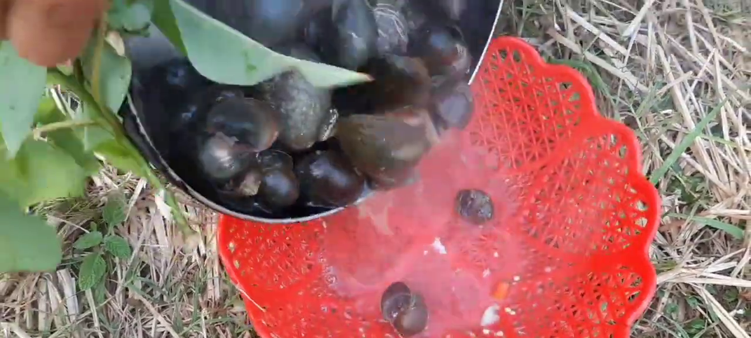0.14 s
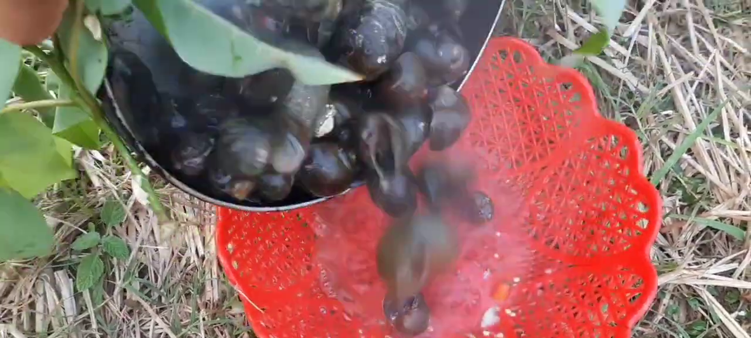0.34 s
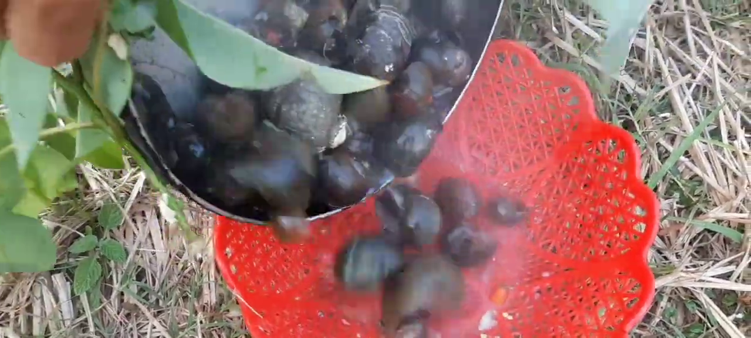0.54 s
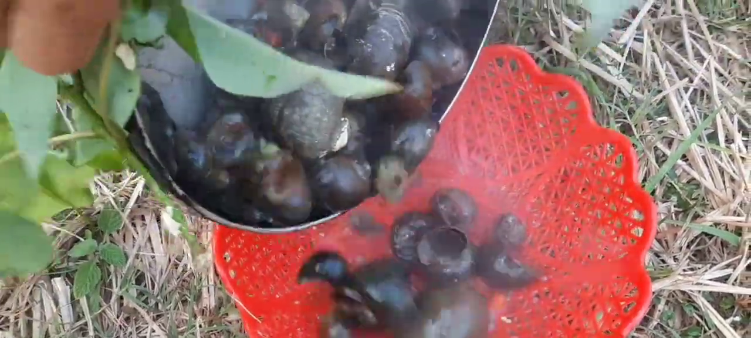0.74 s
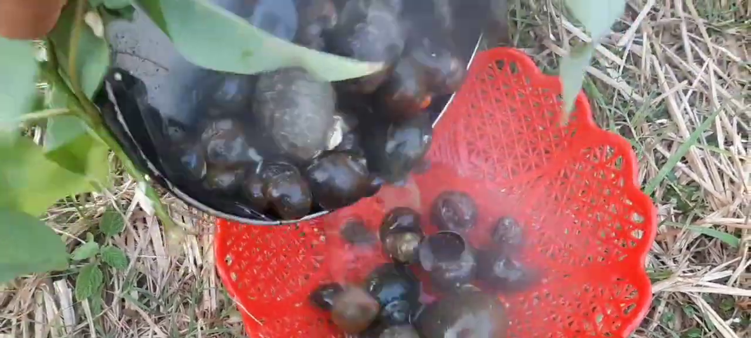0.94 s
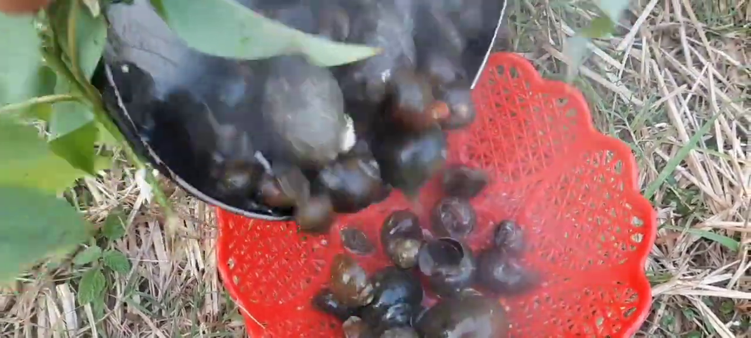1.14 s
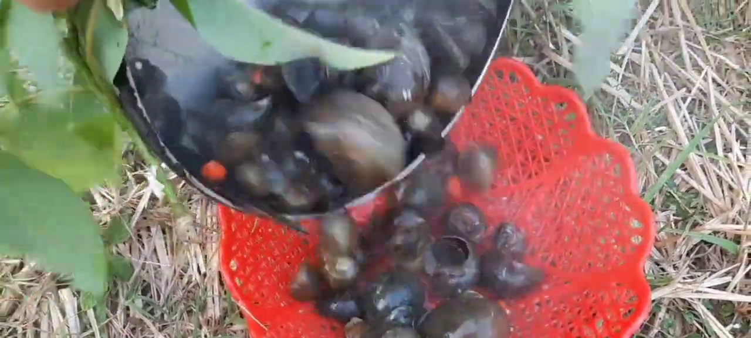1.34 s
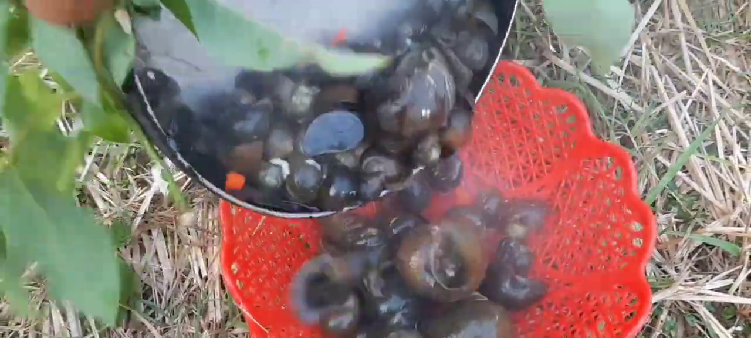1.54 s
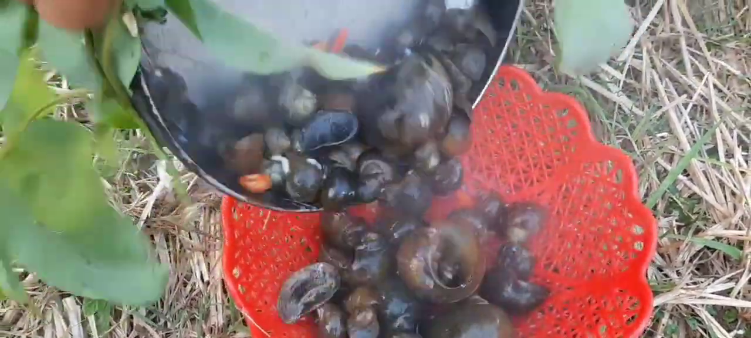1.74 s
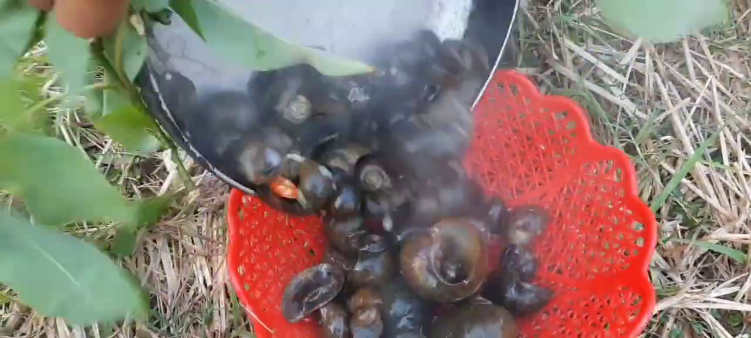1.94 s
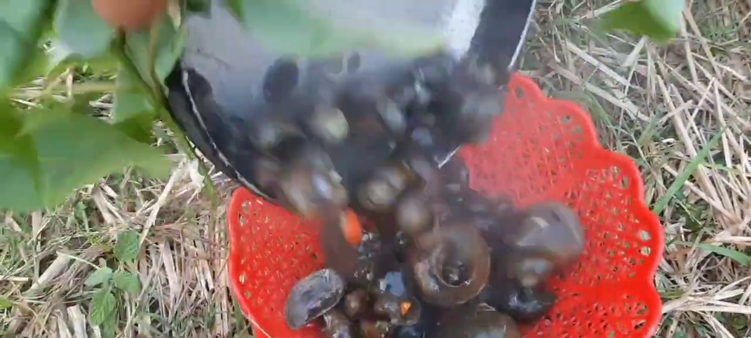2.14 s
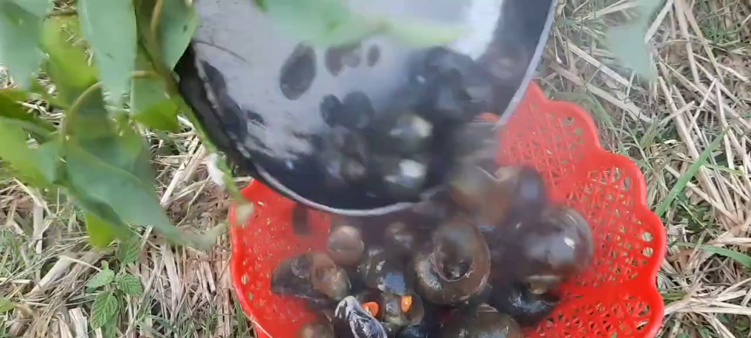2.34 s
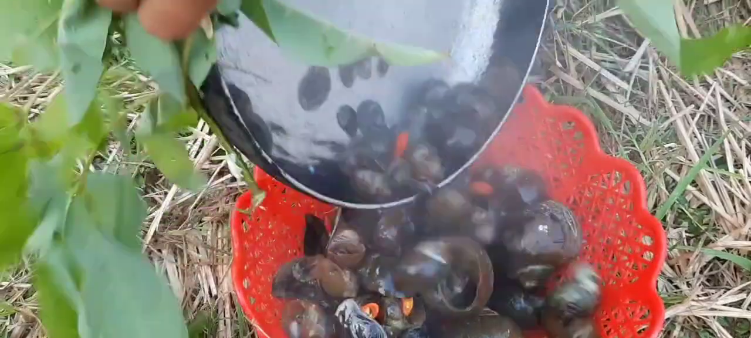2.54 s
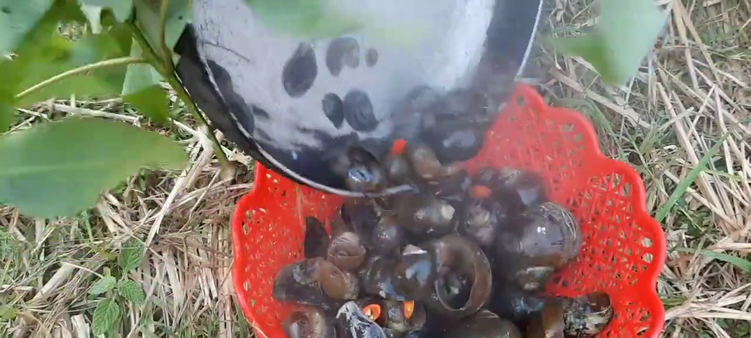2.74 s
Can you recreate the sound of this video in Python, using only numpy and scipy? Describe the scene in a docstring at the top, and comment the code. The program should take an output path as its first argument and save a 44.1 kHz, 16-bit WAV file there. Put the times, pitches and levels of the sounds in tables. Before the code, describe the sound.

Hard-shelled snails tumble out of a metal pan onto a plastic colander with knocks and brief rings.

```python
"""On the ground outdoors, close by, wet snails are tipped from a metal pan into a plastic colander.
Shells knock and slide in the pan, whose fading modes ring more freely as it empties. They drop on the heap
with clacks: a knock, a snap and a short note from the shell, hollow when low, a hard wall ping when high.
The colander gives dead, low thuds under the heavier landings, and a little water spatters through it.
Scrape and spatter are trains of tiny contacts; filtered noise makes the faint outdoor air."""
import sys
import numpy as np
from scipy import signal
from scipy.fft import rfft, irfft
from scipy.io import wavfile

SR = 44100
rng = np.random.default_rng(int(sys.argv[2]) if len(sys.argv) > 2 else 0)


def put_to_file(sound):
    """Save the sound as 16-bit audio at rate SR, in the file named by the first command-line argument."""
    columns = np.atleast_2d(sound).T  # one column per channel
    safe = np.clip(columns, -1, 1)
    whole_steps = np.round(safe * 32767)
    wavfile.write(sys.argv[1], SR, whole_steps.astype(np.int16))


N = 125685  # length in samples
T = np.arange(int(.3 * SR)) / SR  # time within one short sound, in seconds
EMPTY_S = 1.8  # from this time the pan rings freely

# the pan's ringing modes: pitch_hz [Hz], level_db [dB]
PAN_MODES = [(1008, -5.5), (1304, -1), (1590, -5.5), (1992, -9), (2243, -1), (2369, -7.5), (4060, -6.5),
             (4689, -11.5), (6170, -8)]
# colour of a shell's dull knock: frequency_hz [Hz], level_db [dB]
KNOCK_COLOUR = [(150, -20.5), (450, -8.5), (800, 1), (1500, -3), (2600, 2.5), (3800, -10.5), (6500, -40)]
# colour of a shell's bright snap: frequency_hz [Hz], level_db [dB]
SNAP_COLOUR = [(1800, -24), (3600, -7), (5200, -1), (7400, -5.5), (9500, -20.5), (12500, -17), (15200, -2),
               (16500, -77)]
# how alike the two microphones are: frequency_hz [Hz], likeness [0 unrelated to 1 the same]
MICROPHONE_LIKENESS = [(300, 0.93), (900, 0.94), (1600, 0.54), (4000, 0.044)]


def amp(db):
    """Turns decibels into a plain multiplier."""
    return 10 ** (np.asarray(db) / 20)


def unit(x):
    """Scales to an rms (average strength) of 1."""
    return x / np.sqrt(np.mean(x ** 2) + 1e-20)


def blow(x):
    """Scales a short sound to the energy of rms 1 over a hundredth of a second."""
    window_s = .01
    return unit(x) * np.sqrt(window_s * SR / x.shape[-1])


def read(points, hz):
    """Reads a table at any frequency, with straight lines on a logarithmic frequency scale."""
    f, v = np.transpose(points)
    return np.interp(np.log(hz + 1), np.log(f), v)


def level(points):
    """Draws a loudness curve over the whole scene from (time, dB) points."""
    return amp(np.interp(np.arange(N) / SR, *np.transpose(points)))


def add(mix, start_s, sound):
    """Adds a short sound to the mix at its start time."""
    part = mix[:, max(round(start_s * SR), 0):][:, :sound.shape[1]]
    part += sound[:, :part.shape[1]]


def colour(x, points, size=2048):
    """Filters with the given spectrum, without any sound ahead of the blow."""
    log_gain = np.log(amp(read(points, abs(np.fft.fftfreq(size, 1 / SR)))))
    # this phase packs the filter's response as early as possible
    taps = np.fft.ifft(np.exp(np.conj(signal.hilbert(log_gain)))).real
    return signal.fftconvolve(x, taps[None, :size // 2], axes=1)[:, :x.shape[1]]


def noise(size):
    """Noise at two microphones, alike in the bass and nearly unrelated in the treble."""
    a, b = rfft(rng.standard_normal((2, size)))
    alike = np.clip(read(MICROPHONE_LIKENESS, np.fft.rfftfreq(size, 1 / SR)), -1, 1)
    return irfft(np.array([a, alike * a + np.sqrt(1 - alike ** 2) * b]), size)


def tone(hz, t):
    """A steady note at two microphones; high notes arrive less in step than low ones."""
    alike = np.clip(read(MICROPHONE_LIKENESS, hz), -1, 1)
    half_apart = np.arccos(alike) * rng.choice([-1, 1]) / 2
    return np.sin(2 * np.pi * hz * t + np.array([[half_apart], [-half_apart]]))


def contact(points, decay_s, length_s=0, size=4096, uneven_db=3):
    """A sharp contact, held while the shell scrapes, and its scatter in the bowl; each has its own colour."""
    rise_s, bowl_share, bowl_s = .0005, 0.39, 0.0032
    after = np.maximum(T[:size] - length_s, 0)
    rise = -np.expm1(-T[:size] / rise_s)
    fade = np.exp(-after / decay_s) + bowl_share * np.exp(-after / bowl_s)
    hz = np.geomspace(100, SR / 2, num=32)
    own_db = read(points, hz) + uneven_db * rng.standard_normal(len(hz))
    return blow(colour(noise(size) * rise * fade, np.transpose([hz, own_db])))


def short_note(hz):
    """A struck note swells and dies in a few cycles, so low notes sound longer."""
    swell_cycles = 3.4  # cycles until the note is loudest
    t = T[:4096]
    u = t * hz / swell_cycles
    return blow(tone(hz, t) * u * np.exp(-u))


def small_tick(low_hz=900, high_hz=7000, note_db=-10):
    """A light touch: a tick with one shell's note at a random pitch."""
    # colour of a light rub: frequency_hz [Hz], level_db [dB]
    rub_colour = [(200, -21.5), (800, -7), (3000, -6), (5200, -9.5), (7500, -16.5), (9600, -35.5),
                  (15000, -14.5), (16500, -45)]
    tick = contact(rub_colour, decay_s=0.00091)
    return tick + amp(note_db) * short_note(low_hz * (high_hz / low_hz) ** rng.random())


def grains(per_s, spread_db):
    """Random train of small contacts of uneven size."""
    struck = rng.random(N) < per_s / SR
    return struck * amp(spread_db * np.minimum(rng.exponential(1, N), 3))


def play(train, sound):
    """Sounds one small contact at every grain of a train."""
    return signal.oaconvolve(train[None], sound, axes=1)[:, :N]


def pan_ring(start_s, spot_hz, spread_db=2):
    """The pan's modes, weighted by the spot struck and damped by the snails still lying in it."""
    ring_s, full_share = .165, .35  # time for the lowest mode to fall 60 dB when empty; share of it at the start
    ring_fall = .45  # higher modes die sooner by this power of pitch
    spot_db, spot_octaves = 7, 0.27  # lift and width of the modes favoured by the spot
    t60 = ring_s * np.interp(start_s, [0, EMPTY_S], [full_share, 1])
    ring = np.zeros((2, len(T)))
    for hz, db in PAN_MODES:
        lift_db = spot_db * np.exp(-(np.log2(hz / spot_hz) / spot_octaves) ** 2)
        start_db = db + lift_db + spread_db * rng.standard_normal()
        fade_db = 60 * T / t60 * (hz / PAN_MODES[0][0]) ** ring_fall
        ring += amp(start_db - fade_db) * tone(hz, T)
    return ring


def air(air_db=-47.5):
    """Low outdoor rumble and faint hiss, made of filtered noise."""
    # colour of the open air: frequency_hz [Hz], level_db [dB]
    air_colour = [(45, -14.5), (66, 2.5), (130, -2), (200, -12), (2000, -21), (6000, -32), (15000, -37)]
    return amp(air_db) * unit(colour(noise(N), air_colour))


def spatter(count=16, per_s=330, bowl_hz=330, nudge_db=-10):
    """Drops and small shells tick as the heap settles, and nudge the hollow bowl."""
    # loudness of water and small shells pattering in the colander: time_s [s], level_db [dB]
    spatter_curve = [(.1, -54), (.25, -38.5), (.39, -37.5), (.45, -23.5), (.49, -39), (.88, -35),
                     (1.135, -50.5), (1.33, -27.5), (1.7, -60)]
    trains = [grains(per_s / count, spread_db=5.5) for _ in range(count)]
    ticks = sum(play(train, small_tick()) for train in trains)
    # each train nudges the bowl at a note up to an octave away
    nudges = sum(play(train, short_note(bowl_hz * 2 ** rng.uniform(-0.999, 1))) for train in trains)
    return level(spatter_curve) * (unit(ticks) + amp(nudge_db) * unit(nudges))


def pan_hits(ring_db=-.5, body_db=-7.5, pressed_share=2.1, pressed_s=.009, scratch_s=.0035):
    """Shells bump along the pan: a scratchy knock, a loud first ring and a softer after-ring."""
    # shells tumbling against the pan: start_s [s], contact_length_s [s],
    # spot_hz, the pitch favoured by the spot struck [Hz], knock_db [dB], scratch_db [dB]
    pan_bumps = [(0.1238, 0.012, 1260, -27.5, -43), (0.1386, 0.0028, 1160, -23, -31.5),
                 (0.156, 0.0037, 2210, -23.5, -38), (0.2257, 0.029, 1130, -25.5, -37),
                 (0.2854, 0.0035, 1330, -16.5, -32), (.353, .005, 1330, -21, -34),
                 (0.834, 0.0047, 1310, -29, -55), (0.849, 0.0035, 1070, -20, -31),
                 (0.988, .02, 1300, -27, -48), (1.0366, 0.0031, 1420, -16, -22.5),
                 (1.25, 0.027, 1250, -8, -16.5), (1.481, .008, 1340, -26, -19),
                 (1.495, 0.0017, 1620, -18, -19.5), (1.535, 0.0039, 1570, -12, -22),
                 (1.697, 0.004, 2160, -30, -44), (1.751, 0.0027, 1470, -27.5, -28.5),
                 (1.807, 0.0089, 1590, -23.5, -39.5), (1.97, 0.0025, 1380, -17, -18),
                 (2.047, 0.0082, 1130, -12.5, -24.5), (2.265, 0.0071, 1000, -22, -24),
                 (2.47, 0.0026, 1000, -33, -25.5), (2.766, 0.0034, 1008, -38, -35.5)]
    out = np.zeros((2, N))
    for start_s, length_s, spot_hz, knock_db, scratch_db in pan_bumps:
        rise = np.minimum(T / 0.0017, 1)
        # extra ring during the contact, fading after it
        pressed = 1 + pressed_share * np.exp(-np.maximum(T - length_s, 0) / pressed_s)
        ring = blow(pan_ring(start_s, spot_hz) * rise * pressed)
        add(out, start_s, amp(knock_db + ring_db) * ring)
        knock = amp(knock_db + body_db) * contact(KNOCK_COLOUR, scratch_s, length_s)
        scratch = amp(scratch_db) * contact(SNAP_COLOUR, scratch_s, length_s)
        add(out, start_s, knock + scratch)
    return out


def clacks(note_db=-2, body_db=-6, knock_s=.0025, snap_s=.002):
    """Each falling shell knocks, snaps and gives a short note, hollow when low, a hard wall ping when high."""
    # shell hitting shell: start_s [s], note_hz [Hz], knock_db [dB], snap_db [dB]
    shell_blows = [(0.1897, 1270, -32.5, -31.5), (0.244, 1985, -17, -23.5), (0.304, 3600, -28, -47),
                   (0.3282, 1900, -27, -41), (0.3687, 1810, -23, -18.5), (0.411, 5570, -19.5, -20.5),
                   (0.421, 6700, -19, -29), (0.507, 1850, -30, -26), (0.5164, 5750, -27.5, -21),
                   (0.5406, 6700, -27, -31), (0.591, 2830, -13.5, -25), (0.6309, 1103, -24.5, -18),
                   (0.6461, 2630, -23, -27.5), (0.7084, 2365, -15.5, -23), (0.732, 1400, -27, -22.5),
                   (0.748, 2550, -16.5, -21.5), (0.7884, 2600, -17.5, -29), (0.8167, 2520, -17, -37),
                   (0.8806, 6110, -23.5, -20.5), (1.0046, 5970, -35, -19), (1.1078, 5600, -19, -24),
                   (1.1664, 1170, -31, -37.5), (1.287, 5200, -32, -25.5), (1.2998, 1940, -22, -21),
                   (1.307, 4670, -20, -25.5), (1.3714, 1740, -25, -27), (1.613, 3180, -33.5, -36.5),
                   (1.6815, 2850, -28.5, -32), (1.934, 4080, -29, -28.5), (2.003, 4780, -19.5, -24),
                   (2.0907, 1980, -26.5, -36), (2.134, 2410, -23.5, -26.5), (2.176, 4400, -26, -22.5),
                   (2.311, 4570, -27, -20.5), (2.5212, 3540, -19, -27), (2.552, 1900, -21, -26),
                   (2.589, 2490, -28, -27.5), (2.6122, 5540, -24.5, -27), (2.665, 1580, -36.5, -50),
                   (2.8388, 4900, -30.5, -44)]
    out = np.zeros((2, N))
    for start_s, note_hz, knock_db, snap_db in shell_blows:
        note = amp(note_db) * short_note(note_hz)
        body = amp(body_db) * contact(KNOCK_COLOUR, knock_s)
        snap = amp(snap_db) * contact(SNAP_COLOUR, snap_s)
        add(out, start_s, amp(knock_db) * (note + body) + snap)
    return out


def colander(rustle_share=1.2, thud_s=.004, flex_s=.008):
    """The plastic bowl gives a dead, low thud: a fast-fading note and a rustle around it."""
    # landings that shake the colander: start_s [s], pitch_hz [Hz], level_db [dB]
    landings = [(0.411, 297, -31.5), (0.4369, 340, -25), (0.4595, 462, -15.5), (0.523, 692, -20),
                (0.651, 635, -25.5), (.679, 364, -32.5), (0.7639, 572, -23.5), (0.9084, 316, -29.5),
                (1.3014, 333, -31), (1.3716, 300, -27.5), (1.5364, 633, -26), (2.0482, 750, -24.5)]
    out, t = np.zeros((2, N)), T[:4096]
    for start_s, hz, db in landings:
        body = blow(tone(hz, t) * np.exp(-t / thud_s))
        flex_colour = [(hz / 4, -12), (hz / 2, 0), (hz * 2.7, -1), (hz * 5, -28)]
        flex = contact(flex_colour, flex_s)
        add(out, start_s, amp(db) * blow(body + rustle_share * flex))
    return out


def slide(count=16, per_s=800, spread_db=6.2, ring_db=-4.5):
    """Dense tiny contacts of wet sliding shells make a soft scrape and keep the pan ringing."""
    # strength of shells sliding over the metal: time_s [s], level_db [dB]
    slide_curve = [(.93, -85), (1.0, -23.5), (1.135, -68), (1.19, -43.5), (1.26, -25), (1.34, -46),
                   (1.44, -41.5), (1.505, -25.5), (1.6, -51), (1.72, -41.5), (1.86, -51), (1.94, -33.5),
                   (2.2, -34), (2.31, -22.5), (2.44, -40.5), (2.54, -29), (2.71, -54), (2.8, -40.5)]
    firm_db, scrape_growth = -32, 0.36  # below firm_db the scrape fades faster than the ring
    rub, ring = np.zeros((2, 2, N))
    for _ in range(count):
        train = grains(per_s / count, spread_db)
        rub += play(train, small_tick())
        ring += play(train, pan_ring(EMPTY_S, PAN_MODES[0][0]))  # the lowest mode is lifted
    force = level(slide_curve)
    scrape = (force / amp(firm_db)) ** scrape_growth * unit(rub)
    return force * (scrape + amp(ring_db) * unit(ring))


def scene():
    """Shells, pan and colander in the open air, coloured a little differently at each microphone."""
    # tilt between the microphones: frequency_hz [Hz], left_minus_right_db [dB]
    balance = [(1400, 0.9), (2500, 8), (3600, -1.5), (5000, -6), (7000, 1.5)]
    mix = air() + spatter() + pan_hits() + clacks() + colander() + slide()
    difference_db = read(balance, np.fft.rfftfreq(N, 1 / SR))
    sides = np.array([[.5], [-.5]])  # half to each side
    return irfft(rfft(mix) * amp(difference_db * sides), N)


def record(dry):
    """A low cut; peaks stop at 0.92 of full scale; then the high treble is cut off."""
    low_cut = signal.butter(4, 48, "highpass", fs=SR, output="sos")
    limited = np.clip(signal.sosfilt(low_cut, dry), -.92, .92)
    edge_hz = 16300
    treble_cut = signal.firwin(255, edge_hz, window=("kaiser", 9), fs=SR)
    return signal.oaconvolve(limited, treble_cut[None], "same")


dry = scene()
out = record(dry)
put_to_file(out)
```